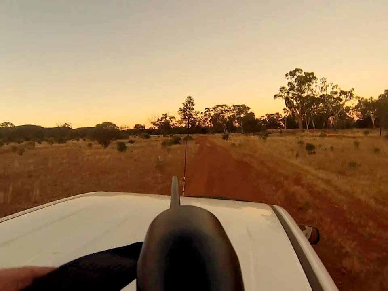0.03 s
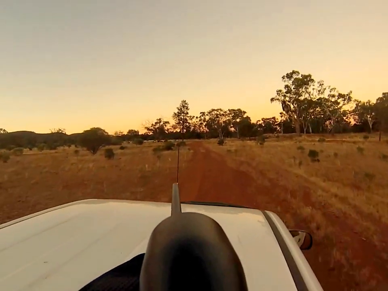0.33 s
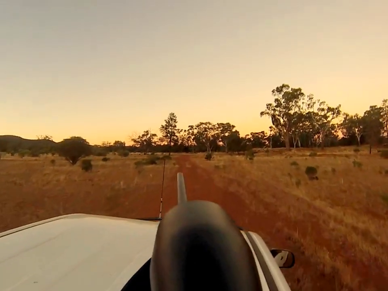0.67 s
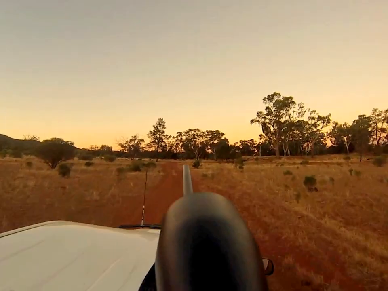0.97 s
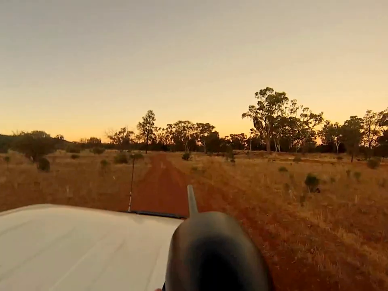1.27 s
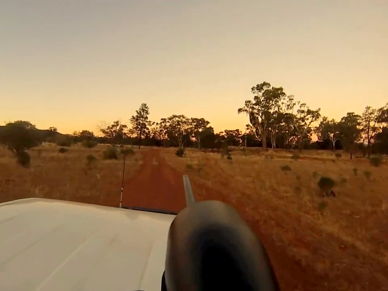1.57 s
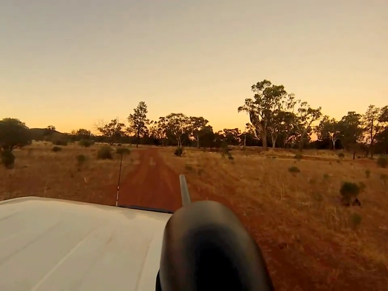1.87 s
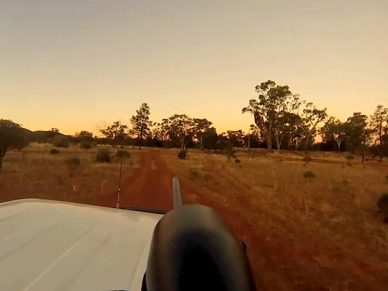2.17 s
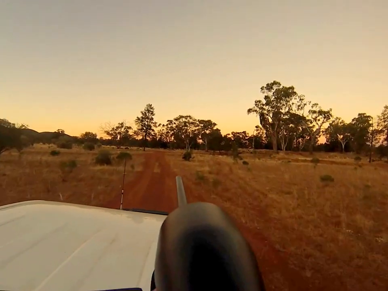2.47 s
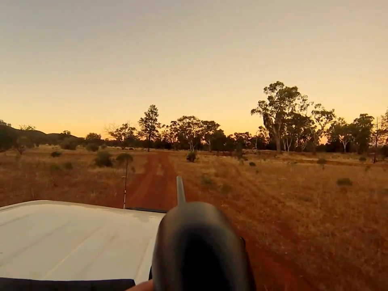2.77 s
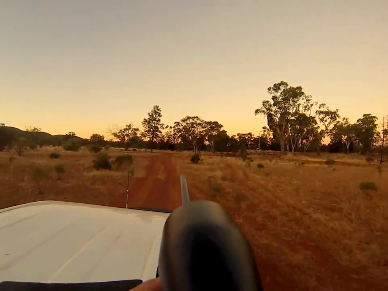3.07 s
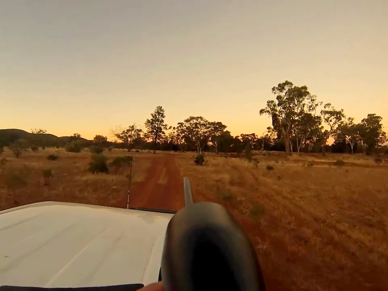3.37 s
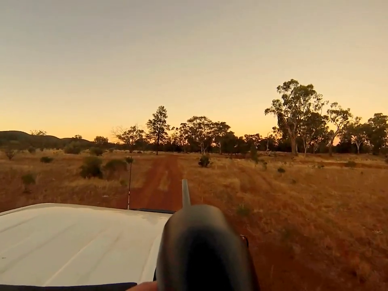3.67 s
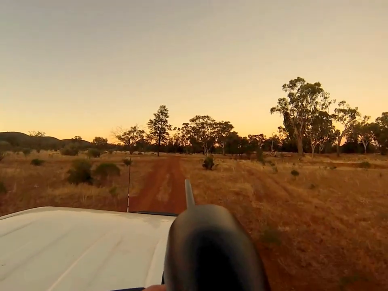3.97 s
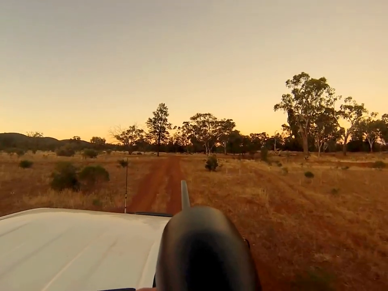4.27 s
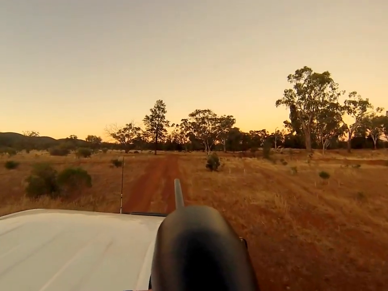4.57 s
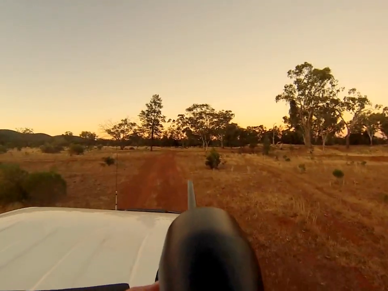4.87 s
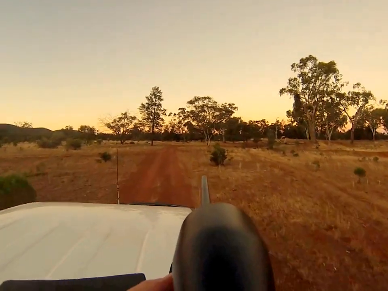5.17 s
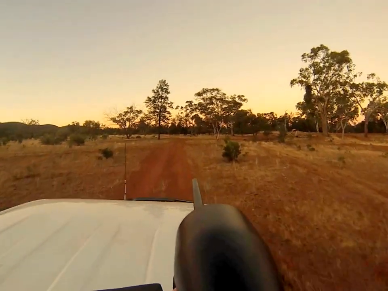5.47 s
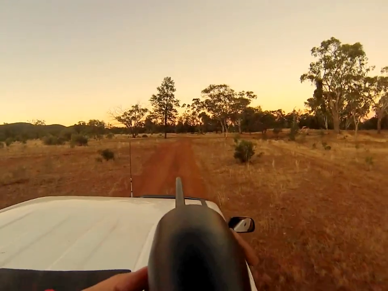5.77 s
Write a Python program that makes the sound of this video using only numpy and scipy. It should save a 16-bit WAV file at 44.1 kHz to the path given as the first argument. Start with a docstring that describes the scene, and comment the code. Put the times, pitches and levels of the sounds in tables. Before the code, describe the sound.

Heard from above the cab roof, a four-wheel-drive creeps along a dirt track. Its engine hums just over idle beneath a low body rumble and the soft roar of tyres on grit, with ruts adding deep bumps. Close by, a strap buckle clicks sharply several times in the first second and a half, mixed with dull knocks from the load. Later the knocks and small rattles come lighter and sparser as the engine eases.

```python
"""A dirt track at dusk, heard from above the cab roof of a creeping four-wheel-drive.
The engine turns just over idle; its firing rate sets a faint gear whine and the hum of the roof.
Rough ground drives the body into a low rumble, ruts set it bouncing and the tyres crunch on grit.
Close by, impacts ring the damped modes of a buckle and of the load, and a strap rustles by friction.
A cricket chirps faintly in the grass, and a thin sizzle flutters at the top of hearing."""
import sys
import numpy as np
from scipy import signal
from scipy.fft import rfft, irfft
from scipy.io import wavfile
from scipy.ndimage import uniform_filter1d, map_coordinates

SR = 44100
rng = np.random.default_rng(int(sys.argv[2]) if len(sys.argv) > 2 else 0)


def wrap_up_sound(samples):
    """Save the sound to the file named by the first command line argument, as 16-bit audio."""
    columns = np.atleast_2d(samples).T
    # keep every value between -1 and 1, then stretch to whole-number steps
    tamed = np.clip(columns, -1, 1)
    steps = np.round(tamed * 32767).astype(np.int16)
    wavfile.write(sys.argv[1], SR, steps)


N = 265480
TIME = np.arange(N) / SR

# impacts that ring the buckle, the rows from 3.468 s on being flung stones striking it: (time [s], relative
# level [dB], low-mode boost [dB], high-mode boost [dB])
BUCKLE_IMPACTS = [(.0095, -46, 3, -7), (.141, -51, 9, -8), (.1798, -46, 14, -8), (0.5618, -38.5, 9.5, 0.5),
                  (.568, -55, 9, -8), (.630, -27.8, -4, 0), (0.651, -45, 3, -13), (.667, -49, 4, -10),
                  (.713, -38, -4, 0), (0.9381, -28, 2.5, 6.5), (1.3144, -38.5, 4.5, -3),
                  (1.319, -49, -3, -4), (1.333, -51, 10, -6), (1.4066, -37, 0, 0), (3.468, -52, -1, -2),
                  (3.5392, -52.5, 5, -1), (3.735, -59, 17, -4)]


def from_db(db):
    """Amplitude ratio of a level in decibels."""
    return 10 ** (np.asarray(db) / 20)


def rms_one(x):
    """Normalisation to an rms of 1."""
    return x / np.sqrt(np.mean(x ** 2) + 1e-20)


def in_time(rows):
    """Linear interpolation of each column after the time, at every sample."""
    times, *columns = np.transpose(rows)
    return [np.interp(TIME, times, column) for column in columns]


def drift(rate_hz):
    """Random fluctuation: low-passed noise with an rms of about 1."""
    step, settling = 40, 2000
    pole = np.exp(-2 * np.pi * rate_hz * step / SR)
    white = rng.standard_normal(N // step + settling + 2)
    slow = signal.lfilter([1], [1, -2 * pole, pole * pole], white)[settling:]
    return np.interp(np.arange(N) / step, np.arange(len(slow)), rms_one(slow))


def colour(x, spectrum):
    """Spectral shaping, with a further 12 dB per octave of roll-off past each end; rms 1."""
    hz, db = np.transpose(spectrum)
    bin_hz = np.maximum(np.arange(N // 2 + 1) * SR / N, 1)
    roll_off = np.minimum(bin_hz / hz[0], 1) ** 2 * np.minimum(hz[-1] / bin_hz, 1) ** 2
    gain = from_db(np.interp(np.log(bin_hz), np.log(hz), db))
    return rms_one(irfft(rfft(x) * roll_off * gain, N))


def noise(spectrum):
    """Coloured Gaussian noise, rms 1."""
    return colour(rng.standard_normal(N), spectrum)


def steady(x, span_s):
    """Division by the running rms evens out slow swells."""
    return x / np.sqrt(uniform_filter1d(x ** 2, int(span_s * SR)) + 1e-9)


def ring(impulses, hz, t60):
    """Damped oscillator: each impulse starts a sine that falls 60 dB in t60 seconds."""
    decay, angle = from_db(-60 / (t60 * SR)), 2 * np.pi * hz / SR
    return signal.lfilter([0, np.sin(angle)], [1, -2 * decay * np.cos(angle), decay**2], impulses + 1e-18)


def strikes(times, gains):
    """One impulse at each time."""
    out = np.zeros(N)
    out[np.clip((np.asarray(times) * SR).astype(int), 0, N - 1)] = gains
    return out


def fade(impulses, t60):
    """Exponential decay: each impulse opens an envelope that falls 60 dB in t60 seconds."""
    return signal.lfilter([1], [1, -from_db(-60 / (t60 * SR))], impulses + 1e-18)


def grains(per_s, spread_db):
    """Poisson process of clicks, many small and a few large; rms 1."""
    sizes = from_db(spread_db * np.minimum(rng.exponential(1, N), 5))
    return rms_one((rng.random(N) < per_s / SR) * sizes * rng.choice([-1, 1], N))


def swells(rows):
    """Rise in dB at every sample: a Gaussian curve for each event."""
    return sum(db * np.exp(-(2 * (TIME - s) / length) ** 2) for s, length, db in rows)


def bells(rows):
    """Gain at every sample: a flat-topped bell rising out of silence for each event."""
    return sum(from_db(db) * np.exp(-(2 * (TIME - s) / length) ** 4 / 2) for s, length, db in rows)


def engine(firings, waver_db, overtone_waver_db, overtone_db, load_share):
    """Periodic excitation: the firing note and overtones follow one crankshaft and grow with load."""
    # firing note under load: (time [s], level [dB])
    load = [(0, -43), (1.1, -47), (1.55, -45), (2.15, -47), (2.8, -52.5), (6.02, -61.5)]
    # engine and gear overtones: (frequency [multiple of the firing rate], relative level [dB])
    overtones = [(4, -64.5), (6, -63), (7, -70.5), (10.2, -70.5), (12, -67.5), (15, -64), (18.4, -69.5),
                 (20.8, -67.5)]
    note_db, = in_time(load)
    effort_db = note_db - note_db.mean()
    out = from_db(note_db + waver_db * drift(7.8)) * np.sin(2 * np.pi * firings + 0.21 * drift(5.4))
    for multiple, db in overtones:
        phase = 2 * np.pi * (multiple * firings + rng.random()) + 0.61 * drift(4.36)
        gain = from_db(db + overtone_db + load_share * effort_db + overtone_waver_db * drift(14))
        out += gain * np.sin(phase)
    return np.sqrt(2) * out


def roof(firings, hum_db, waver_db):
    """Forced vibration: the roof hums at three times the firing rate; panels resonate on overtones."""
    # panel resonances: (time [s], duration [s], frequency [multiple of the firing rate], level [dB])
    resonances = [(0.14, .4, 4, -64.5), (5.88, 0.23, 3, -53.5), (5.6, 0.92, 7.1, -63)]
    phase = 2 * np.pi * firings
    out = from_db(hum_db + waver_db * drift(10)) * np.sin(3 * phase)
    for s, length, multiple, db in resonances:
        out += bells([(s, length, db)]) * from_db(waver_db * drift(10)) * np.sin(multiple * phase)
    return np.sqrt(2) * out


def rasp(firings, level_db, pulse_depth):
    """Amplitude modulation: the engine's thin metallic rasp pulses at the firing rate."""
    # swells of the rasp: (time [s], duration [s], rise [dB])
    surges = [(3.5, 0.54, 6.5), (4.4, 0.45, 6.5)]
    # rasp spectrum: (frequency [Hz], relative density [dB])
    spectrum = [(2400, -13.5), (2950, -2.5), (3500, -24)]
    pulsing = 1 + pulse_depth * np.cos(2 * np.pi * firings)
    return from_db(level_db + swells(surges)) * pulsing * noise(spectrum)


def drone(waver_db, wander_hz):
    """Slow modulation: a low pure tone swells and bends as the vehicle works over the track."""
    # course of the drone: (time [s], frequency [Hz], level [dB])
    course = [(0, 73.5, -50.5), (.65, 72, -52), (.85, 71.54, -42), (1.08, 77.1, -48.5), (1.42, 79, -45),
              (1.62, 74, -54.5), (2.0, 70, -54), (2.24, 71.5, -37.5), (2.42, 77.06, -49), (2.56, 72.3, -45),
              (2.85, 68.1, -50.5), (3.08, 71.73, -49.5), (3.4, 72.55, -55.5), (3.85, 71.5, -46),
              (4.2, 72, -55), (5.0, 70, -46.5), (6.02, 72, -59)]
    hz, db = in_time(course)
    cycles = np.cumsum(hz + wander_hz * drift(4.1)) / SR
    return np.sqrt(2) * from_db(db + waver_db * drift(9.3)) * np.sin(2 * np.pi * cycles)


def track(firings, rumble_db, panel_db, tyre_db, grit_db, rocking_db, clatter_depth):
    """Random excitation: rough ground rocks the body and shakes panels; tyres roar and crush grit."""
    # relative levels of the ride: (time [s], body rumble [dB], panel drumming [dB], tyre roar [dB])
    ride = [(0, -44.5, -54.5, -57), (.9, -44.5, -52.5, -55.5), (1.5, -47.5, -48, -56),
            (2.3, -41.5, -52.5, -56), (2.8, -45, -51.5, -56), (3.2, -46.5, -48.5, -58),
            (3.75, -45, -52.5, -57.5), (4.5, -44.5, -53.5, -59.5), (5.25, -44.5, -50.5, -57.5),
            (6.02, -49, -54, -59.5)]
    # spectra of the four noises: (frequency [Hz], relative density [dB])
    body_spectrum = [(12, -12), (22, 2.5), (36, -3), (46, -2), (60, 3.5), (75, -3), (95, -3.5),
                     (125, -19.5), (200, -36)]
    panel_spectrum = [(70, -10.5), (105, 0), (140, 0.5), (210, -2.5), (290, -8.5), (400, -11.5), (600, -50)]
    tyre_spectrum = [(250, -1), (400, 0), (520, 4), (600, 0), (720, 3), (900, -3), (1100, -4.5),
                     (1370, -16), (1650, -16.5), (1950, -16), (2350, -27.5), (2900, -20.5), (3800, -29),
                     (6000, -41)]
    grit_spectrum = [(2000, 4.5), (3200, 2.5), (4000, 0), (4800, 1), (5600, 3), (6600, -5.5), (9000, -7),
                     (12500, -8.5), (15000, -20)]
    # panels shudder as the body twists: (time [s], duration [s], rise [dB])
    shudders = [(2.24, 0.27, 6), (2.86, 0.14, 5), (3.55, 0.14, 2.5)]
    # patches of loose grit: (time [s], duration [s], rise [dB])
    loose_patches = [(.1, 0.38, 4.5), (1.25, 0.98, 2.5), (2.9, 0.44, 2), (5.05, 0.66, 3.5),
                     (5.89, 0.088, 5)]
    body_db, drumming_db, roar_db = in_time(ride)
    rocking = from_db(body_db + rumble_db + rocking_db * drift(5.1))
    rumble = rocking * steady(noise(body_spectrum), span_s=0.12)
    drumming = from_db(drumming_db + panel_db + swells(shudders))
    panels = drumming * steady(noise(panel_spectrum), span_s=0.1)
    crunch = colour(rng.standard_normal(N) + 0.6 * grains(per_s=700, spread_db=2), tyre_spectrum)
    clatter = 1 + clatter_depth * np.cos(2 * np.pi * firings)   # each firing swells the roar
    tyres = from_db(roar_db + tyre_db + 1.1 * drift(30)) * crunch * clatter
    gravel = colour(rng.standard_normal(N) + 0.51 * grains(per_s=640, spread_db=3.5), grit_spectrum)
    grit = from_db(grit_db + swells(loose_patches) + 0.5 * drift(11)) * gravel
    return rumble + panels + tyres + grit


def sizzle(flutter_db, flutter_hz):
    """Random amplitude modulation: a faint band of noise flutters at the top of hearing."""
    # course of the sizzle: (time [s], level [dB])
    course = [(0, -91), (.75, -90), (1.4, -99), (2.4, -85), (3.3, -100), (4.0, -90), (4.7, -87),
              (5.3, -103), (6.02, -89)]
    # sizzle spectrum: (frequency [Hz], relative density [dB])
    spectrum = [(13300, -39), (14300, 2), (15100, 1), (16000, -36)]
    level_db, = in_time(course)
    flutter = rms_one(from_db(flutter_db * np.tanh(drift(flutter_hz))))
    return from_db(level_db) * flutter * noise(spectrum)


def buckle_ring(gain_db, contact_s, rough_hz):
    """Modal vibration: a brief contact excites each mode; where it lands weights low and high modes."""
    # buckle modes: (frequency [Hz], relative level [dB], 60 dB decay time [s])
    modes = [(1066, -15.5, 0.038), (1426, -14, 0.026), (1656, -13, 0.014), (1874, -17, 0.042),
             (2319, -10, 0.0094), (2630, -19, 0.022), (2994, -19.5, 0.041), (3630, -6, 0.012),
             (5920, -32.5, 0.014)]
    times, db, low_db, high_db = np.transpose(BUCKLE_IMPACTS)
    push = np.hanning(int(contact_s * SR))
    last_hit = np.maximum.accumulate(np.where(strikes(times, 1) > 0, np.arange(N), 0))
    out = np.zeros(N)
    for k, (hz, mode_db, t60) in enumerate(modes):
        lowness = np.interp(hz, [1700, 2650], [1, 0]) ** 2
        highness = np.interp(hz, [2650, 3600], [0, 1]) ** 2
        hits = strikes(times, from_db(db + gain_db + mode_db + lowness * low_db + highness * high_db))
        envelope = fade(np.convolve(hits, push / push.sum())[:N], t60)
        cycles = np.cumsum(hz + rough_hz * drift(110)) / SR   # loose parts chatter, roughening the pitch
        out += (-1) ** k * envelope * np.sin(2 * np.pi * (cycles - cycles[last_hit]))
    return out


def buckle_crack(gain_db, t60, rise_t60):
    """Contact transient: each buckle click opens with a very short broadband burst."""
    # contact spectrum: (frequency [Hz], relative density [dB])
    spectrum = [(700, -23), (1500, 20), (3800, 2.5), (4600, -1), (5900, -6), (6600, -14), (10000, -22),
                (14000, -52)]
    times, db = np.transpose(BUCKLE_IMPACTS)[:2]
    hits = strikes(times, from_db(db + gain_db))
    return (fade(hits, t60) - fade(hits, rise_t60)) * noise(spectrum)


def load_knocks(gain_db, falloff_db_per_octave):
    """Selective excitation: the load bumps the body, and the point of impact favours nearby pitches."""
    # dull knocks: (time [s], relative level [dB], favoured frequency [Hz])
    impacts = [(0.01, -32, 581), (.148, -39, 564), (.1795, -41.5, 720), (.186, -40, 574), (.307, -40, 696),
               (0.564, -31, 603), (.6315, -36.5, 820), (.6675, -33.5, 563), (.836, -43.5, 1060),
               (0.941, -38, 690), (1.044, -44.5, 999), (1.272, -44, 1050), (1.301, -35.5, 538),
               (1.319, -41, 680), (1.566, -42, 870), (1.635, -37.5, 573), (1.936, -42.5, 690),
               (2.78, -40.5, 703), (2.866, -39.5, 554), (3.157, -46, 800), (3.185, -42, 710),
               (3.239, -51, 560), (3.398, -59, 487), (3.733, -48, 770), (4.255, -54, 550),
               (5.291, -45, 694), (5.394, -40, 490), (5.709, -42, 600)]
    # modes of the load: (frequency [Hz], relative level [dB], 60 dB decay time [s])
    modes = [(495, 3, 0.096), (558, 3, 0.033), (687, 3.5, 0.031), (833, 0.5, 0.044), (1049, 3, 0.054)]
    times, db, favoured_hz = np.transpose(impacts)
    out = np.zeros(N)
    for k, (hz, mode_db, t60) in enumerate(modes):
        octaves_away = np.abs(np.log2(hz / favoured_hz))
        strength = from_db(db + gain_db + mode_db - falloff_db_per_octave * octaves_away)
        out += (-1) ** k * ring(strikes(times, strength), hz, t60)
    return out


def strap_scratches(snags_per_s, spread_db):
    """Sliding friction: webbing drags over an edge in a dense run of tiny snags."""
    # drags of the strap: (time [s], duration [s], level [dB])
    drags = [(.275, .014, -76), (.311, 0.014, -74), (.554, 0.088, -75), (1.208, .022, -76),
             (1.237, 0.01, -72), (1.39, .012, -75), (4.87, .014, -73)]
    # friction spectrum: (frequency [Hz], relative density [dB])
    spectrum = [(3000, 1), (5800, 6.5), (8000, 4), (10000, -0.5), (13000, -12)]
    return bells(drags) * colour(grains(snags_per_s, spread_db), spectrum)


def stones(gain_db, t60):
    """Impact noise: flung stones strike the underside with short, bright ticks."""
    # stone impacts: (time [s], relative level [dB])
    impacts = [(0.306, -70), (0.837, -65.5), (1.205, -62), (1.268, -66), (1.629, -62), (2.683, -66),
               (2.77, -66.5), (2.888, -69), (3.467, -64), (3.539, -62), (3.729, -66), (4.87, -80),
               (5.419, -73)]
    # tick spectrum: (frequency [Hz], relative density [dB])
    spectrum = [(900, -4), (1800, 12), (3200, 15), (4500, 5.5), (5700, 11.5), (7000, -10), (12000, -12),
                (15000, -19)]
    times, db = np.transpose(impacts)
    return fade(strikes(times, from_db(db + gain_db)), t60) * noise(spectrum)


def ruts(gain_db, t60, rise_t60):
    """Damped free vibration: each rut sets the body bouncing; the springs soften the onset."""
    # jolts of the body: (time [s], relative level [dB], bounce frequency [Hz])
    jolts = [(1.136, -25.5, 21.7), (1.252, -39, 58), (1.72, -29, 60), (1.901, -35, 37.64),
             (2.278, -24.5, 35.46), (2.481, -26.5, 55), (2.831, -28.5, 54), (3.051, -30.5, 69),
             (3.205, -30, 48.9), (3.38, -31, 51.9), (3.989, -36, 56.5), (4.224, -33, 50.8),
             (4.965, -28, 72.2), (5.405, -27.5, 72), (5.821, -33, 56.1)]
    impulses = [(strikes([s], from_db(db + gain_db)), hz) for s, db, hz in jolts]
    return sum(ring(impulse, hz, t60) - ring(impulse, hz, rise_t60) for impulse, hz in impulses)


def strap_squeaks(gain_db):
    """Narrow-band friction noise: taut webbing slips, and the pitch follows the sliding speed."""
    # slips: (time [s], duration [s], centre frequency [Hz], half-width [fraction of centre],
    # glide [octaves/s], relative level [dB])
    slips = [(1.216, .045, 5700, .08, 0, -70), (2.897, 0.013, 3600, .04, 0, -69),
             (2.982, 0.092, 6400, .06, 1, -82), (3.075, .085, 5900, .025, -3, -78),
             (4.109, .018, 3770, .05, .11, -71), (4.9, 0.07, 7223, .04, 0, -80),
             (5.334, .085, 4905, .012, -2, -80), (5.509, 0.055, 6550, .05, .14, -74.5)]
    out = np.zeros(N)
    for s, length, hz, width, glide, db in slips:
        edge = 1 + width
        band = signal.butter(2, [hz / edge, hz * edge], "band", fs=SR, output="sos")
        fibres = rms_one(signal.sosfilt(band, rng.standard_normal(SR)))
        near = np.flatnonzero(np.abs(TIME - s) < 2 * length)
        position = np.cumsum(2 ** (glide * (TIME[near] - s)))
        envelope = np.exp(-(2 * (TIME[near] - s) / length) ** 2)
        out[near] += from_db(db + gain_db) * envelope * map_coordinates(fibres, [position])
    return out


def cricket(pitch_hz, chirps_per_s, level_db, uneven_db, from_s, to_s, fade_s):
    """Pulse modulation: a nearly pure tone chirps unevenly, fading in and out as the cricket is passed."""
    cycles = np.cumsum(chirps_per_s * (1 + 0.054 * drift(4.4))) / SR
    chirps = np.maximum(np.sin(2 * np.pi * cycles), 0) ** 2 * from_db(uneven_db * drift(6))
    tone = np.sin(2 * np.pi * np.cumsum(pitch_hz + 80 * drift(150)) / SR)
    nearness = np.clip(np.minimum(TIME - from_s, to_s - TIME) / fade_s, 0, 1)
    return np.sqrt(2) * from_db(level_db) * nearness * chirps * tone


def load_rattles(contacts_per_s, spread_db):
    """Shot noise: the shifting load chatters in a quick, uneven run of small contacts."""
    # shifts of the load: (time [s], duration [s], level [dB])
    shifts = [(2.85, 0.082, -58.5), (3.74, 0.029, -52.5), (4.71, 0.075, -61), (5.25, 0.11, -58),
              (5.455, 0.056, -60), (5.715, 0.02, -61)]
    # rattle spectrum: (frequency [Hz], relative density [dB])
    spectrum = [(330, 7.5), (540, -4.5), (820, 0.5), (1100, -2), (1400, -21), (1900, -24)]
    return bells(shifts) * colour(grains(contacts_per_s, spread_db), spectrum)


def scene():
    """Superposition: the vehicle, its cargo and the roadside add in one channel."""
    # engine speed, as the pitch of the gear whine: (time [s], frequency [Hz])
    whine = [(0, 531.5), (.7, 545), (2.3, 549.1), (3.6, 551.6), (4.4, 537), (6.02, 536.3)]
    whine_hz, = in_time(whine)
    firings = np.cumsum(whine_hz / 15) / SR   # running count; 15 cycles of whine to a firing
    vehicle = engine(firings, waver_db=1, overtone_waver_db=0.6, overtone_db=-1.4, load_share=0.23)
    vehicle += roof(firings, hum_db=-61, waver_db=0.5)
    vehicle += rasp(firings, level_db=-88, pulse_depth=0.32)
    vehicle += drone(waver_db=0.1, wander_hz=0.53)
    ground = track(firings, rumble_db=-0.5, panel_db=-2.5, tyre_db=0.33, grit_db=-79,
                   rocking_db=1.3, clatter_depth=0.085)
    ground += stones(gain_db=0.5, t60=0.089)
    ground += ruts(gain_db=-5.5, t60=0.35, rise_t60=0.05)
    cargo = buckle_ring(gain_db=-2, contact_s=0.0022, rough_hz=40.3)
    cargo += buckle_crack(gain_db=-13, t60=0.025, rise_t60=0.0015)
    cargo += load_knocks(gain_db=-4, falloff_db_per_octave=38.5)
    cargo += load_rattles(contacts_per_s=400, spread_db=2.5)
    cargo += strap_squeaks(gain_db=-3.5)
    cargo += strap_scratches(snags_per_s=2500, spread_db=1)
    air = cricket(pitch_hz=8480, chirps_per_s=8.8, level_db=-92, uneven_db=3,
                  from_s=1.3, to_s=5.6, fade_s=0.2)
    air += sizzle(flutter_db=9, flutter_hz=28)
    return (vehicle + ground + cargo + air)[None]


def record(dry):
    """Band limiting: an elliptic low-pass filter cuts steeply above 15.3 kHz."""
    return signal.sosfilt(signal.ellip(10, 0.1, 80, 15300, fs=SR, output="sos"), dry)


dry = scene()
out = record(dry)
wrap_up_sound(out)
```